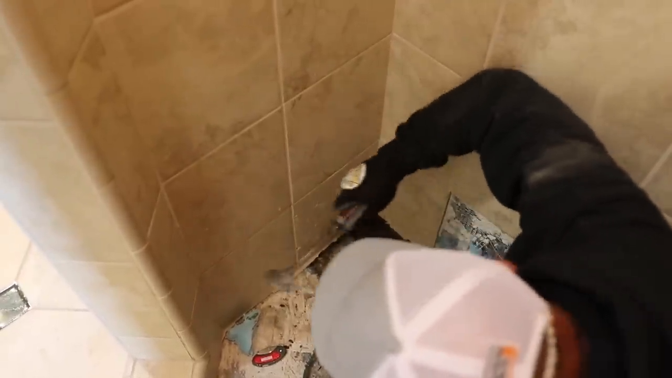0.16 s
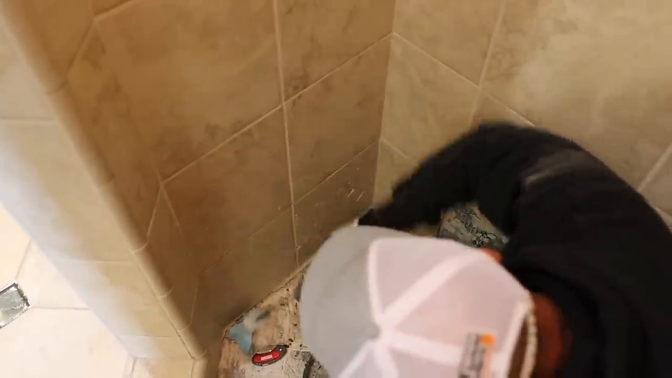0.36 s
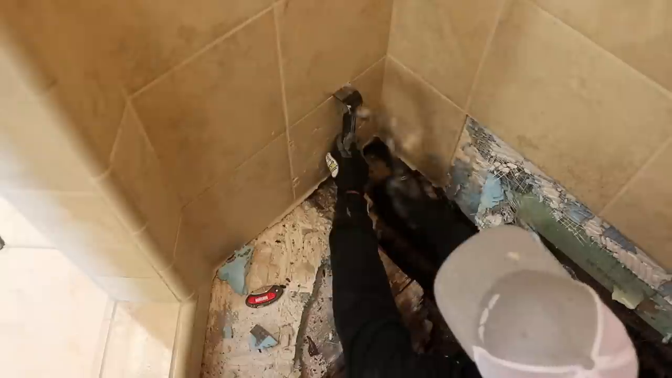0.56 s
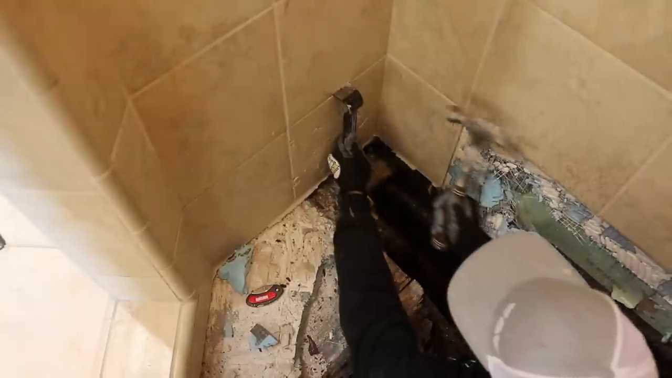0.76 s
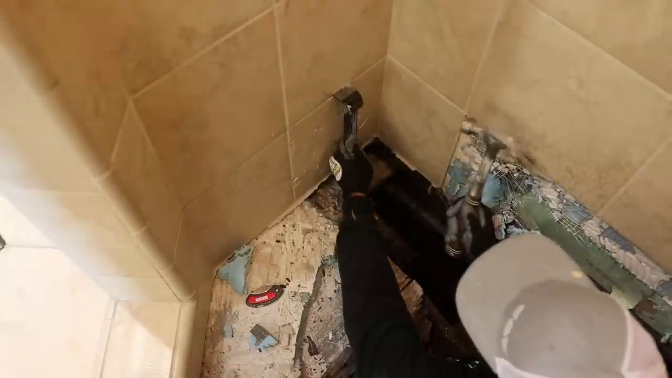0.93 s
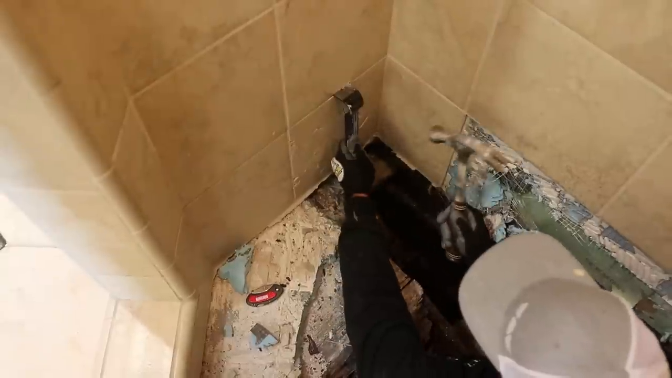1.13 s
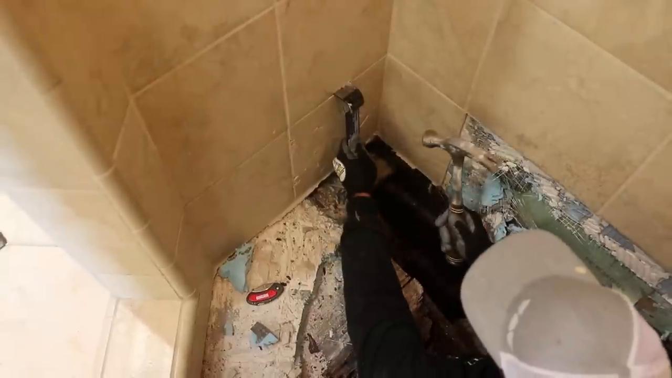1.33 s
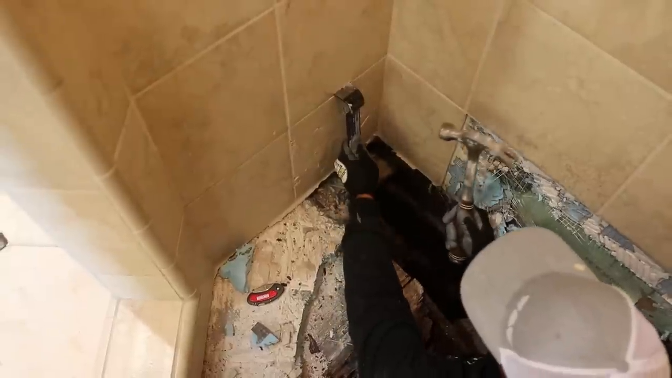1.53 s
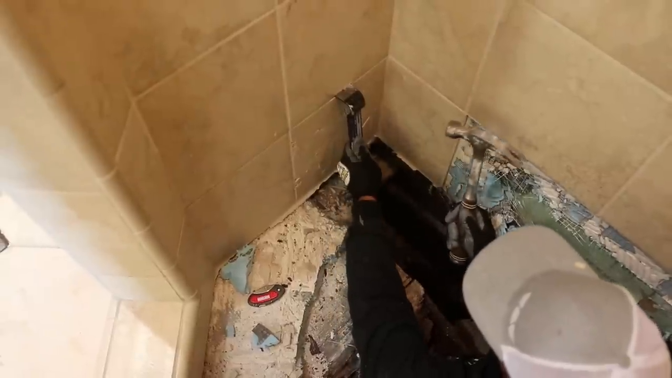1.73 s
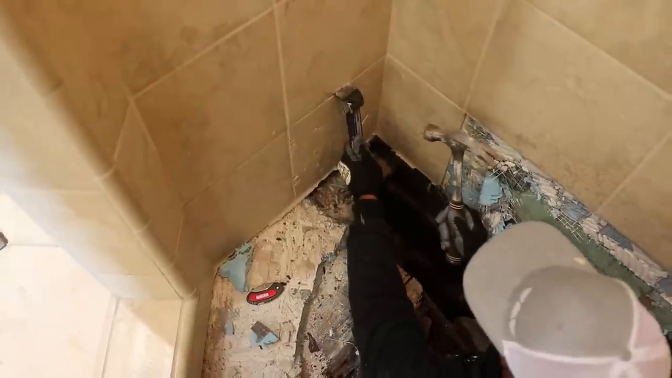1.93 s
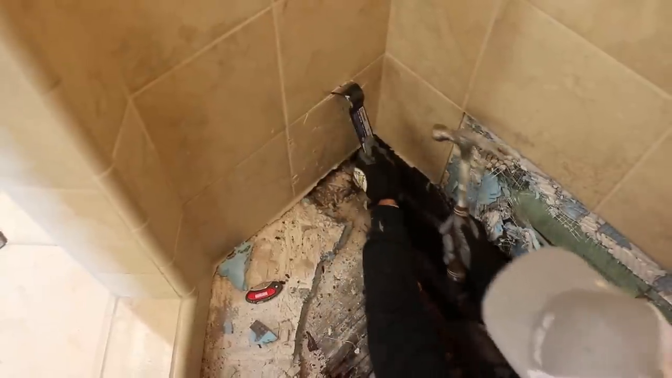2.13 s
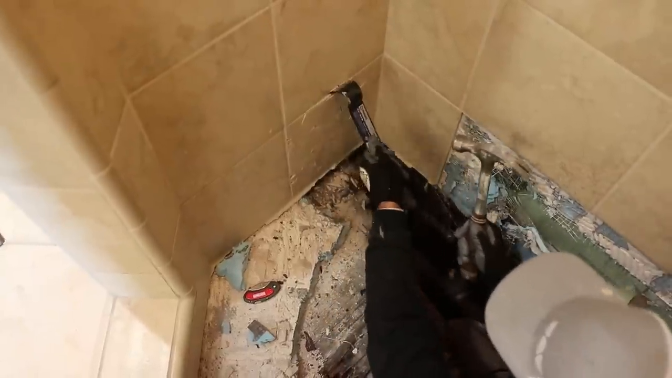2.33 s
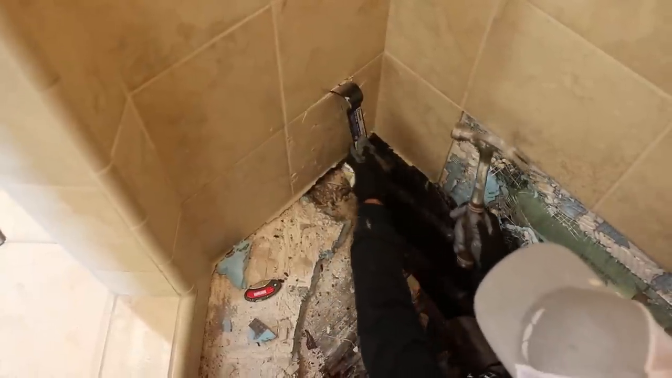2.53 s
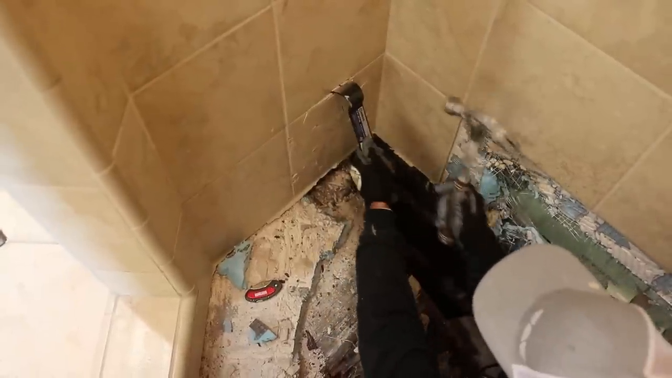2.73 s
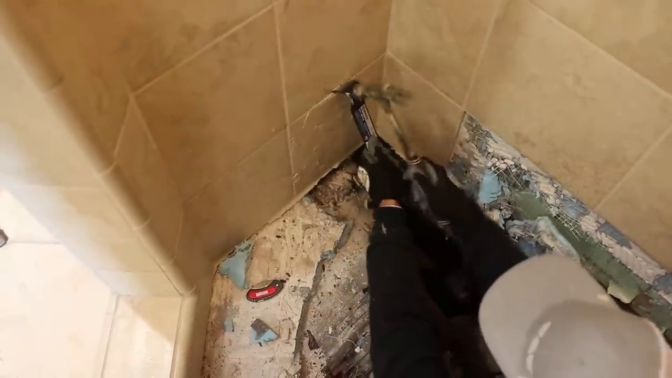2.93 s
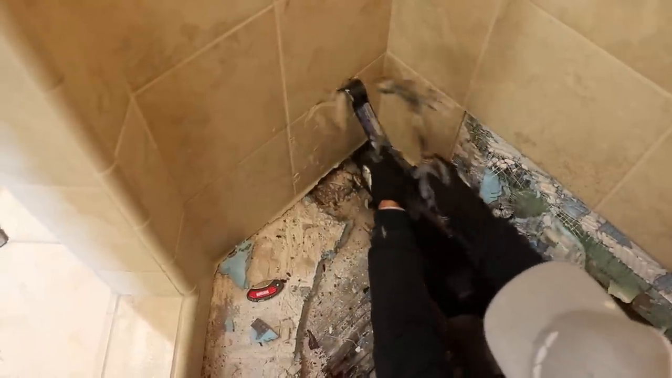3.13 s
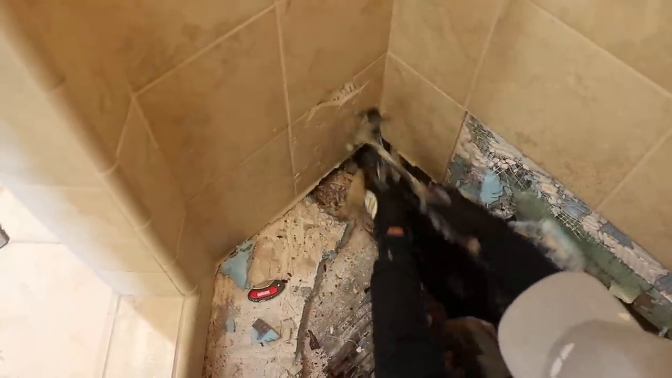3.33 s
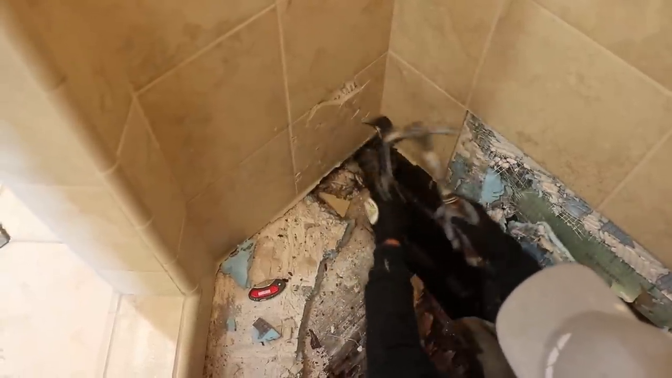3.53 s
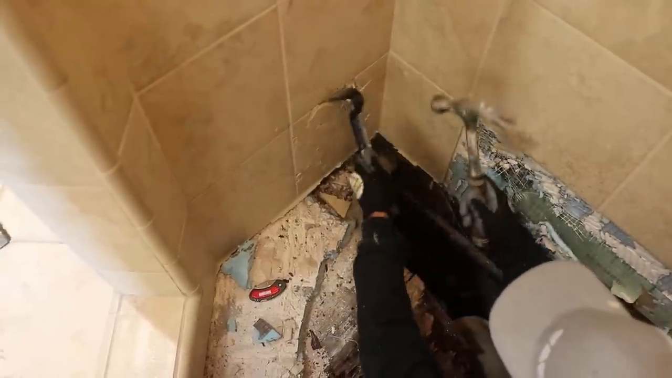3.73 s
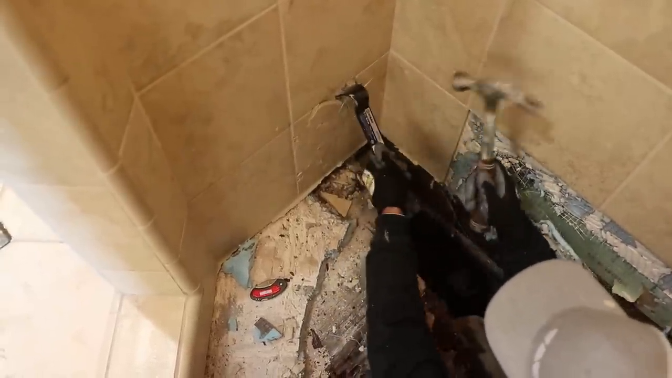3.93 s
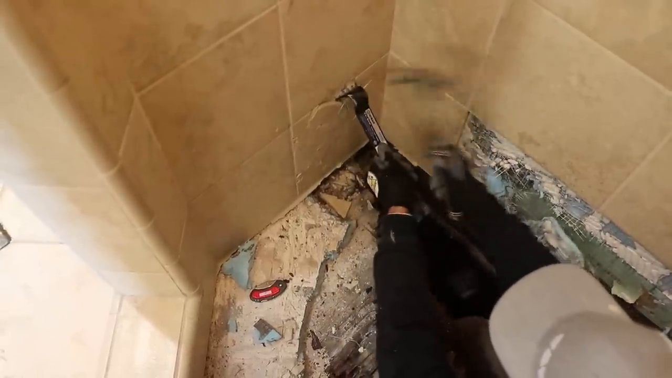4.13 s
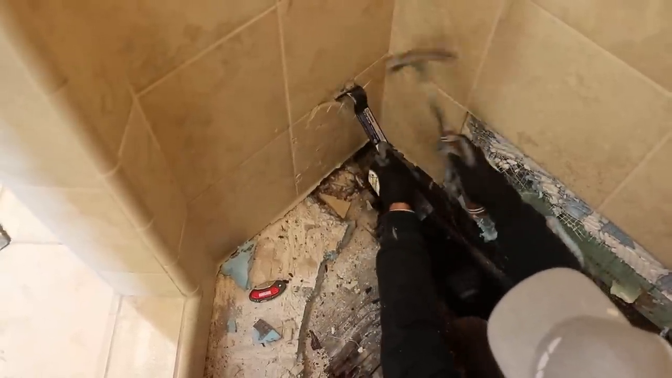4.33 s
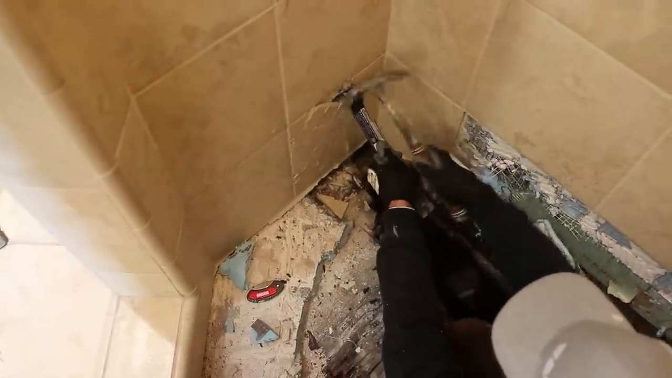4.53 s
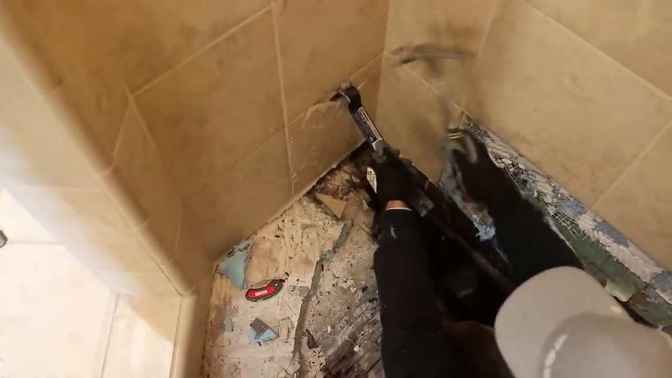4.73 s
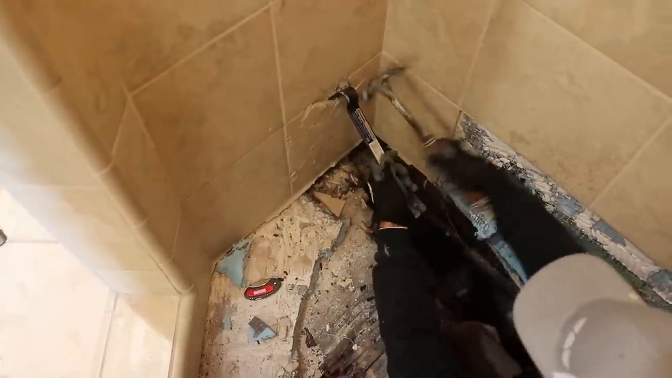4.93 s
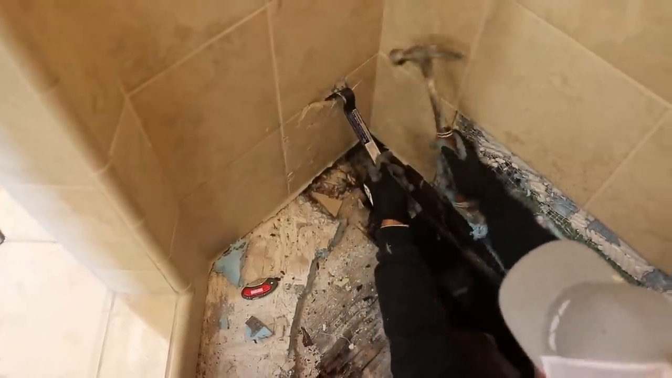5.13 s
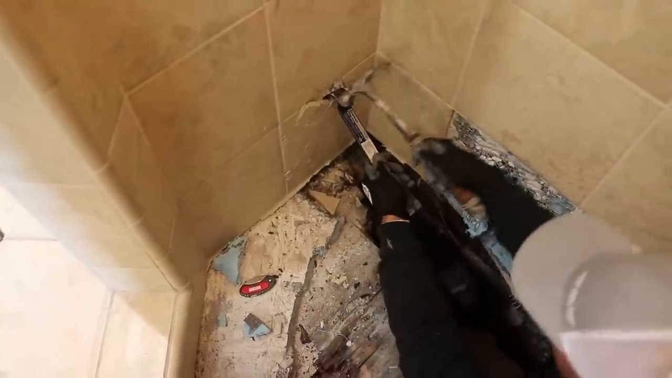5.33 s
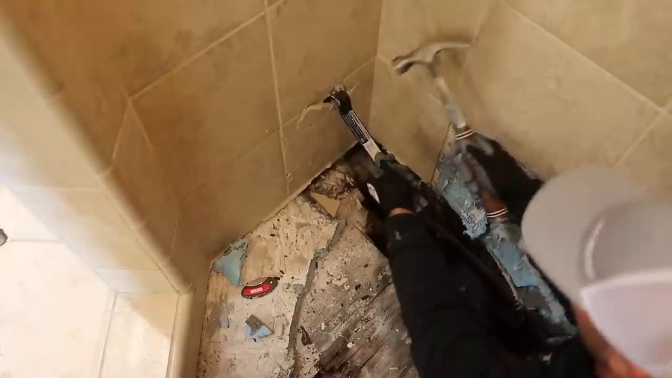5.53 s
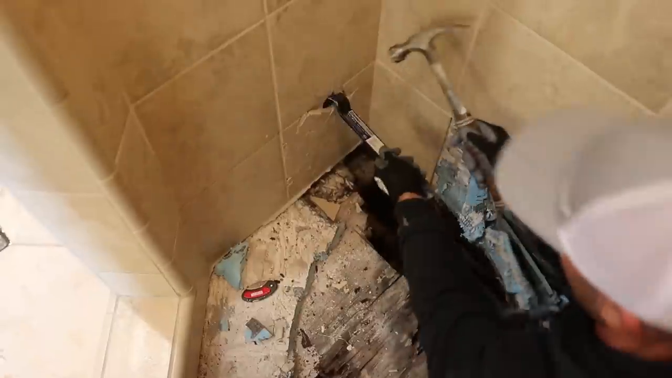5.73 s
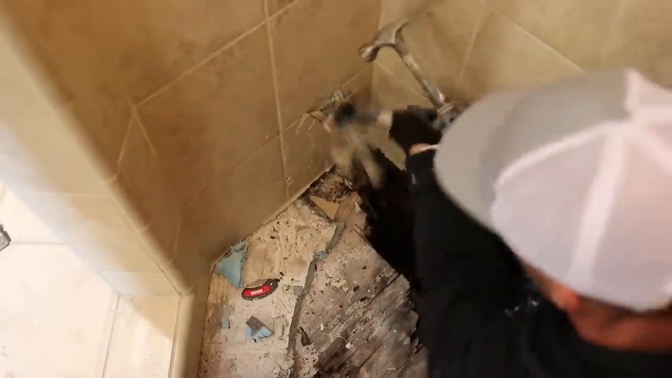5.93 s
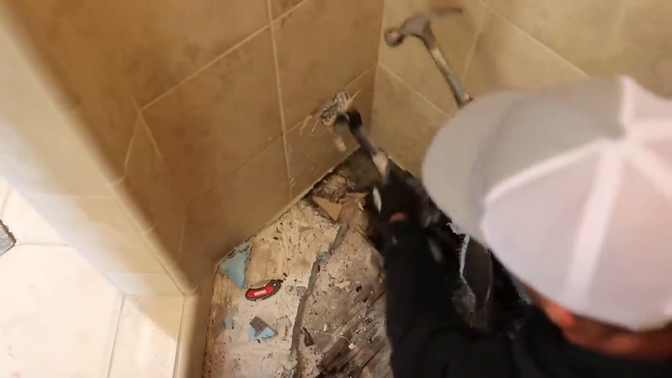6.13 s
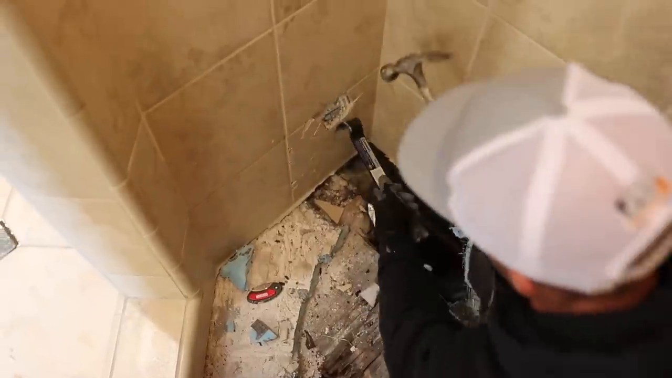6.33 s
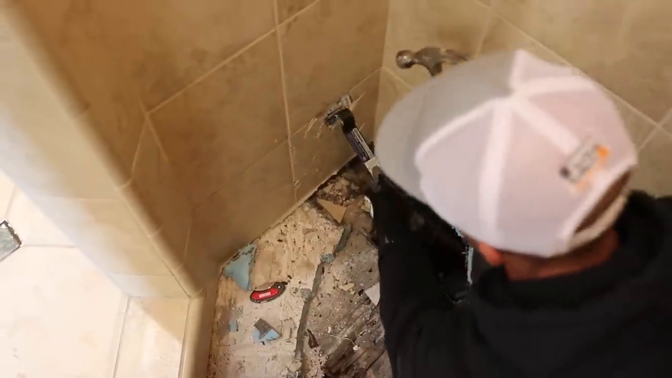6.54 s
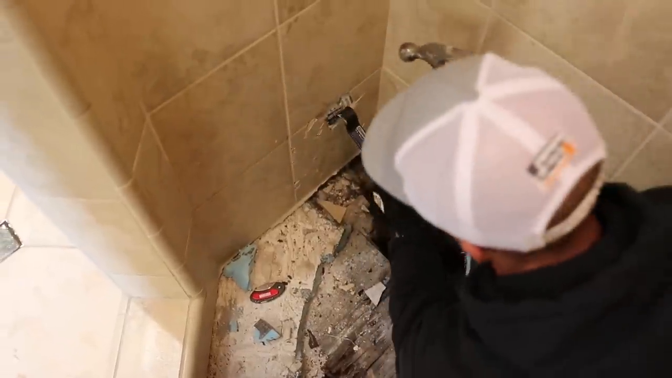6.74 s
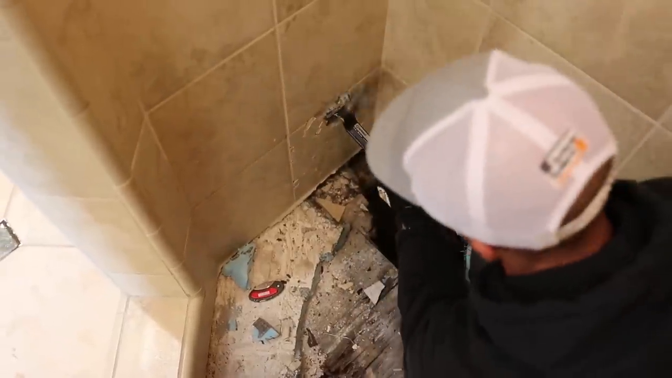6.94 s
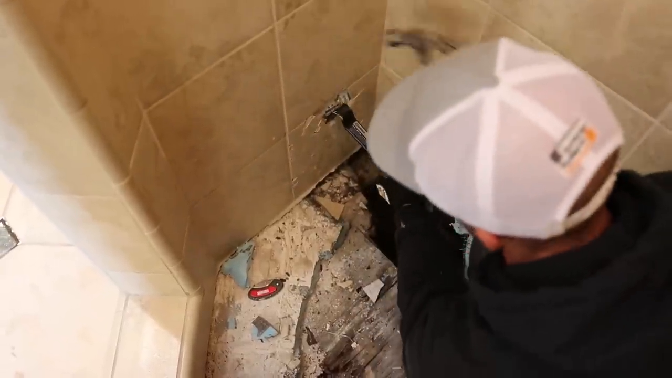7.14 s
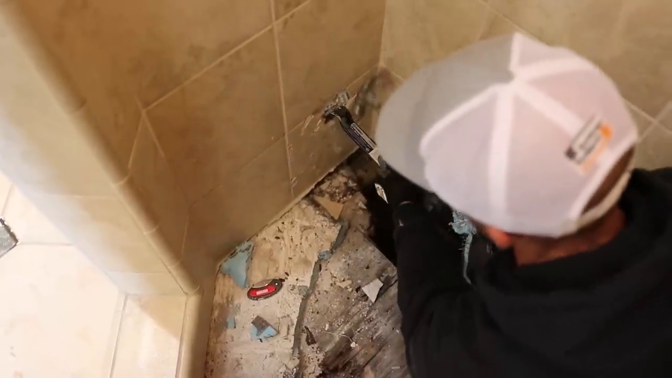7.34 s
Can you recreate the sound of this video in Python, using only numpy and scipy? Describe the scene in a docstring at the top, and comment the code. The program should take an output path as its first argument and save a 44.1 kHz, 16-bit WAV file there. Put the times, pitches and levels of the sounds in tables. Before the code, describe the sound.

In a small, hard, reverberant shower stall, a hammer cracks once onto a steel pry bar, with a high fluttering ring and a hollow wall boom. The bar is then rocked with small gritty ticks until a tile cracks loose, creaks and sheds debris. More blows follow at an even pace, then tile pieces knock and crumble, and two final blows land. Close microphone; the loud hits sound flattened, with quiet room air underneath.

```python
"""In a small, hard, tiled shower stall a claw hammer drives a steel pry bar behind the wall tiles.
Each blow is a crushing noise burst, dying bar modes, a fluttering ring and the hollow wall's dense boom.
Levering makes mortar tick and crumble (noise bursts, random grains) and creak by stick-slip; the bar scrapes;
tile pieces knock as damped modes and bursts, steel clinks and fine debris slides down as dense grains.
Sparse and dense echoes form the stall, quiet coloured noise the room air; a limiter flattens the loud blows."""
import sys
import numpy as np
from scipy import signal
from scipy.fft import rfft, irfft
from scipy.io import wavfile
from scipy.ndimage import uniform_filter1d, minimum_filter1d

SR = 44100
rng = np.random.default_rng(int(sys.argv[2]) if len(sys.argv) > 2 else 0)


def to_wav(s):
    """Save 16-bit WAV."""
    ch = np.atleast_2d(s).T  # columns
    pcm = np.round(np.clip(ch, -1, 1) * 32767)  # PCM
    wavfile.write(sys.argv[1], SR, pcm.astype(np.int16))


N = 325017
TIME = np.arange(N) / SR

# tile cracking loose and pieces knocking, levels relative: (time [s], clack level [dB], thud level [dB],
# snap level [dB], clack pitch [Hz], crunch t60 [s], delay of the rebound [s])
KNOCKS = [(1.867, -35, -55, -34.5, 778, 0.026, 0.054), (2.005, -21, -23, -23, 856, 0.067, .041),
          (2.016, -12.5, -40, -20, 1430, 0.053, .008), (2.034, -14.5, -28, -17.5, 557, 0.14, .012),
          (2.396, -30, -38, -45, 674, 0.07, 0.0086), (2.868, -47, -55, -35.5, 627, .03, 0.018),
          (3.187, -18, -20, -25, 608, .045, 0.022), (3.290, -23, -21, -24, 665, 0.052, 0.023),
          (3.348, -31, -39, -34, 583, 0.027, 0.018), (3.456, -22, -30, -30.5, 976, 0.021, 0.02),
          (3.544, -36.5, -51, -52.5, 423, 0.039, 0.025), (3.782, -30.5, -24.5, -43, 581, 0.03, .019),
          (5.651, -25, -36.5, -32, 928, .05, 0.018), (5.902, -20, -31, -18.5, 630, 0.14, .009),
          (5.918, -15, -19.5, -32, 1025, 0.031, .012), (6.040, -18, -45, -43, 712, 0.068, 0.0087),
          (6.142, -14, -28, -37.5, 516, 0.08, 0.014), (6.226, -30, -35, -44.5, 466, 0.048, 0.013),
          (6.340, -28, -32, -44, 400, 0.063, 0.0067), (6.429, -37.5, -58, -57, 624, .05, .008),
          (6.821, -41, -49, -47.5, 475, .05, 0.0097), (6.891, -37, -36, -41, 496, 0.076, 0.0066),
          (7.045, -26.5, -46, -53, 697, 0.044, .005)]
# spectrum of dull thuds and of the flexing board: (frequency [Hz], relative gain [dB])
THUD_COLOUR = [(20, -48), (60, 2), (170, 11.5), (280, 2), (500, -11.5), (2000, -63)]
# spectrum of hollow rattle and of the low crunch in a tick: (frequency [Hz], relative gain [dB])
RATTLE_COLOUR = [(150, -25.5), (400, 4.5), (700, 9), (1100, 5), (1800, 2.5), (3000, -8.5), (8000, -79)]


def amp(db):
    """Level to amplitude: 20 dB is a factor of ten."""
    return 10 ** (np.asarray(db) / 20)


def evened(x):
    """Energy normalization: scales to an rms of 1."""
    return x / np.sqrt(np.mean(x ** 2) + 1e-20)


def peaked(x, size=220):
    """Short-time energy normalization: scales the loudest 220 samples (5 ms) to an rms of 1."""
    power = uniform_filter1d(x ** 2, size, mode="constant")
    return x / np.sqrt(power.max())


def read(points, hz):
    """Interpolates a spectrum on a logarithmic frequency axis."""
    f, value = np.transpose(points)
    return np.interp(np.log(hz + 1), np.log(f + 1), value)


def add(mix, s, sound):
    """Superposition: adds a sound to the mix from time s, cutting what lies outside."""
    start = round(s * SR)
    sound = sound[max(-start, 0):]
    part = mix[max(start, 0):][:len(sound)]
    part += sound[:len(part)]


def coloured(x, points, size=2048):
    """Minimum-phase filtering: shapes the spectrum causally, so attacks stay sharp."""
    hz = abs(np.fft.fftfreq(size, 1 / SR))
    log_gain = np.log(amp(read(points, hz)))
    response = np.exp(np.conj(signal.hilbert(log_gain)))
    taps = np.fft.ifft(response).real[:size // 2]
    return signal.fftconvolve(x, taps)[:len(x)]


def burst(t60, grit, size=6000):
    """Impact excitation: a unit click, then an exponentially dying noise crunch of norm grit."""
    x = rng.standard_normal(size) * amp(-60 * np.arange(size) / SR / t60)
    x *= grit / np.linalg.norm(x)
    x[0] += 1
    return x


def modes(table, t, spread_db=2):
    """Modal synthesis: sums damped sines whose random shares stand for the varying point of contact."""
    total = 0
    for hz, db, t60 in table:
        level_db = db + spread_db * rng.standard_normal() - 60 * t / t60
        total = total + amp(level_db) * np.sin(2 * np.pi * hz * t) * rng.choice([-1, 1])
    return total


def waver(size, hz):
    """Low-passed Gaussian noise: a slow random fluctuation of rms 1."""
    spectrum = rfft(rng.standard_normal(size))
    low_pass = np.exp(-(np.fft.rfftfreq(size, 1 / SR) / hz) ** 2)
    return evened(irfft(spectrum * low_pass, size))


def grains(per_s, spread_db):
    """Shot noise: clicks at random times, of random sign and uneven size."""
    size = amp(spread_db * np.minimum(rng.exponential(1, N), 4))
    return size * rng.choice([-1, 1], N) * (rng.random(N) < per_s / SR)


def stroke(start, length, attack_s, fade_db_per_s):
    """Force envelope: rises linearly, holds to the end of its length, then dies exponentially."""
    t = TIME - start
    return np.clip(t / attack_s, 0, 1) * amp(-fade_db_per_s * np.maximum(t - length, 0))


def stall(x, early_db, late_db, early_t60=0.17, echoes_per_s=900):
    """Room response: sparse early echoes of close tiled walls, then the diffuse decay of the bathroom."""
    # reverberation time by band: (frequency [Hz], t60 [s])
    decay_times = [(100, 0.39), (400, 0.51), (1000, 0.57), (2500, 0.58), (5000, 0.58), (9000, 0.43),
                   (15000, 0.23)]
    t = np.arange(SR) / SR
    early, late = rng.choice([-1., 1.], (2, SR))
    early *= (rng.random(SR) < echoes_per_s / SR) * (t > .002) * amp(-60 * t / early_t60)
    late *= 1 - np.exp(-t / 0.0022)  # the diffuse field builds up
    hz, at, bands = signal.stft(late, SR, nperseg=256)
    bands = bands * amp(-60 * at / read(decay_times, hz)[:, None])
    late = signal.istft(bands, SR, nperseg=256)[1][:SR]
    echo = amp(early_db) * early / np.linalg.norm(early)
    echo += amp(late_db) * late / np.linalg.norm(late)
    echo[0] += 1  # direct sound
    return signal.fftconvolve(x, echo)[:len(x)]


def room_air(air_db=-62.5):
    """Stationary noise: quiet air, shaped by its spectrum."""
    # (frequency [Hz], relative gain [dB])
    air_colour = [(18, -55), (30, -9), (121, 6.5), (165, -21), (311, -6), (355, 0.5), (461, -7),
                  (1100, -14.5), (1320, -17), (16000, -30.5)]
    return amp(air_db) * evened(coloured(rng.standard_normal(N), air_colour))


def boom(t, bass_db, t60=0.59, bass_edge_hz=100):
    """High modal density: many close wall modes, crowded round resonances, die away together."""
    # resonances of the hollow wall: (frequency [Hz], width [Hz], relative level [dB])
    resonances = [(48.7, 10, -4.5), (73.8, 16, 2), (135.6, 14.5, 4), (140, 27, -13.5), (187.4, 24, -9.5),
                  (300, 84, -5), (392, 86, -4), (632, 120, -6), (960, 240, -10)]
    hz = np.fft.rfftfreq(len(t), 1 / SR)
    shape = 0
    for centre, width, db in resonances:
        shape = shape + amp(db) / np.sqrt(width) / (1 + (2 * (hz - centre) / width) ** 2)
    # the deepest modes depend on where the bar sits
    shape = shape * amp(bass_db / (1 + (hz / bass_edge_hz) ** 6))
    x = evened(irfft(shape * np.exp(2j * np.pi * rng.random(len(hz))), len(t)))
    x /= np.sqrt(uniform_filter1d(x ** 2, size=3000))  # even out the level before the decay
    return x * amp(-60 * t / t60) * (1 - np.exp(-t / .002))


def bar_ring(t, t60, ring_hz=5317):
    """Weakly damped mode: the one that the hand hardly damps, fluttering in the standing waves."""
    # the ringing bar moves through the standing waves of the stall
    sway = 1 + .45 * (waver(len(t), hz=22) + 1j * waver(len(t), hz=22))
    return amp(-60 * t / t60) * (sway * np.exp(2j * np.pi * ring_hz * t)).imag


def hammer(crack_db=-16, clang_db=-27, boom_db=-24, ring_db=-27):
    """Impact on coupled bodies: each blow crushes mortar, clangs the bar and sets the wall booming."""
    # hammer on the bar, levels relative: (time [s], force [dB], wall boom [dB], deep bass of the boom [dB],
    # clang [dB], treble tilt [dB per octave, well above 1 kHz], long ring [dB], ring t60 [s])
    blows = [(-.19, 4.5, -4, 3, -52, -5.5, -3, 0.49), (.566, -35, -2, 0, -30, -3, 17.5, 0.34),
             (.603, 0.5, 8, -13, -11, 0.5, 7.5, 0.77), (2.988, -2.5, 3.5, -8, -31, -.5, 3, 1),
             (4.2607, -5.5, 3.5, 1.5, -15, 2.5, 5, 0.79), (4.614, -3.5, 2.5, 1.5, -10.5, 1.5, 7, 0.63),
             (4.956, -2, 0.5, 1, -15.5, 4.5, 4.5, 0.62), (5.319, -6.5, 3.5, 3.5, -16, 4, -13, 1),
             (7.003, -5.5, 5, -2, -16, 4, 5, 0.69), (7.337, -7, -18, 0, -6, 2, 8, 0.99)]
    # short modes of the bar before the grip acts: (frequency [Hz], relative level [dB], t60 [s])
    bar_modes = [(2020, -23, 0.25), (2680, -28, 0.12), (3820, -10, 0.095), (3980, -5, 0.035),
                 (4130, 10.5, 0.051), (4540, -27, .12), (5400, 6, 0.27), (6210, -8, 0.15),
                 (6410, -5, 0.047), (8040, 3.5, 0.1), (8070, 7.5, 0.049), (9700, -16, 0.32),
                 (10600, -8, 0.025), (12000, -6.5, 0.13), (13830, -16, 0.06)]
    # crushing noise before the tilt: (frequency [Hz], relative gain [dB])
    blow_colour = [(30, 13), (100, 9), (450, 7), (900, 6.5), (1500, -1.5), (2300, -7), (2900, -3.5),
                   (3500, -10.5), (4400, -4.5), (6200, -7.5), (7400, -17.5), (10000, -14), (11500, -26.5),
                   (16000, -29.5)]
    out, t = np.zeros(N), np.arange(int(1.4 * SR)) / SR
    for s, force, wall_db, bass_db, clang, tilt, ring, ring_t60 in blows:
        colour = [(hz, db + tilt * np.log2(1 + hz / 1000)) for hz, db in blow_colour]
        crushing = burst(t60=0.025, grit=3.6, size=len(t))
        crack = amp(crack_db) * peaked(coloured(crushing, colour))
        # grip and wedging damp the bar and shift its modes a little from blow to blow
        gripped = [(hz * (1 + .015 * rng.standard_normal()), db, min(t60, .2)) for hz, db, t60 in bar_modes]
        steel = amp(clang_db + clang) * modes(gripped, t, spread_db=4.0)
        wet = stall(crack + steel, early_db=9, late_db=0.5, echoes_per_s=2500)
        wall = amp(boom_db + wall_db) * boom(t, bass_db)
        tone = amp(ring_db + ring) * bar_ring(t, ring_t60)
        add(out, s, amp(force) * (wet + wall + tone))
    return out


def scraping():
    """Friction force: how hard the steel edge is dragged over the tile."""
    # the bar scraping the tile edge: (start [s], length [s], relative level [dB])
    drags = [(3.819, 0.08, -40), (4.007, 0.067, -36.5), (6.534, 0.085, -41.5)]
    return sum(amp(db) * stroke(s, length, attack_s=0.014, fade_db_per_s=356) for s, length, db in drags)


def crumble(grit_db=-3, rattle_db=-3, flex_db=-2, debris_db=-27, scrape_flex_db=-2, attack_s=0.019):
    """Granular fracture: pushes and knocks loosen grains that run down behind the tile; the board rumbles."""
    # pushes on the bar that crumble mortar and flex the wall board, levels relative:
    # (start [s], length [s], grit level [dB], hollow rattle level [dB], board rumble level [dB])
    pushes = [(0.87, 0.42, -61, -67, -58), (1.395, 0.52, -69, -66, -59), (1.871, 0.12, -52.5, -51, -74),
              (2.01, 0.058, -29, -31, -35.5), (2.268, 0.13, -35.5, -36.5, -40),
              (2.465, 0.074, -50, -42, -68), (2.66, 0.65, -57, -61, -58), (3.176, 0.13, -41, -33.5, -31.5),
              (4.072, 0.092, -66, -63, -47.5), (5.658, 0.042, -38, -40, -44.5),
              (5.756, 0.18, -36.5, -36, -57), (5.889, 0.013, -35, -28, -27.5), (6.04, 0.097, -70, -70, -43),
              (6.456, 0.22, -63.5, -64, -53.5), (6.857, 0.056, -63, -58, -48)]
    # spectrum of breaking grit: (frequency [Hz], relative gain [dB])
    grit_colour = [(600, 8), (2000, -17), (3200, 8.5), (6000, 7), (8000, -0.5), (13000, 1.5),
                   (16000, -38.5)]
    breaking = falling = bending = shaken = 0
    for s, length, break_db, fall_db, bend_db in pushes:
        breaking = breaking + amp(break_db) * stroke(s, length, attack_s, fade_db_per_s=304)
        falling = falling + amp(fall_db) * stroke(s, length, attack_s, fade_db_per_s=202)
        bending = bending + amp(bend_db) * stroke(s, length, attack_s, fade_db_per_s=109)
    for s, clack, *_ in KNOCKS:  # rubble that each knock shakes loose
        shaken = shaken + amp(clack + debris_db) * stroke(s, 0, attack_s, fade_db_per_s=152)
    grit = evened(coloured(grains(per_s=350, spread_db=6.5), grit_colour)) * breaking
    rattle = evened(coloured(grains(per_s=830, spread_db=5.0), RATTLE_COLOUR)) * (falling + shaken)
    flex = evened(coloured(grains(per_s=480, spread_db=3.0), THUD_COLOUR))
    flex *= bending + amp(scrape_flex_db) * scraping()  # a scrape also shakes the board
    loose = amp(grit_db) * grit + amp(rattle_db) * rattle
    return stall(loose, early_db=-0.5, late_db=-23) + amp(flex_db) * flex


def tick(crunch_db, top_db, tick_db=-5):
    """Brittle fracture: one mortar bond snaps, a short burst with a bright top and a low crunch."""
    # middle of the tick: (frequency [Hz], relative gain [dB])
    tick_colour = [(500, -5.5), (2000, 3), (3000, 5), (4300, 0), (5900, 3), (7500, -2), (10000, -28),
                   (16000, -75)]
    # bright top: (frequency [Hz], relative gain [dB])
    top_colour = [(3000, -82), (7000, -39), (9000, -2.5), (13000, -5.5), (16000, -12)]
    snap = burst(t60=.012, grit=1.2, size=2000)
    parts = (tick_db, tick_colour), (top_db, top_colour), (crunch_db, RATTLE_COLOUR)
    return sum(amp(db) * peaked(coloured(snap, colour)) for db, colour in parts)


def ticks(crunch_db=-6, nudge_crunch_db=-8, uneven_db=2.5, count=3, gap_s=0.013, fade_db=-2):
    """Successive fracture: each nudge snaps an uneven run of mortar bonds; chips break or land singly."""
    # the bar rocked in the joint: (time [s], mean level of the first tick [dB])
    nudges = [(1.077, -52), (1.1659, -47), (1.2372, -43), (1.32, -42.5), (1.409, -40.5), (1.49, -41),
              (1.586, -44), (1.6664, -38), (1.749, -39), (1.982, -38)]
    # single chips breaking off or landing: (time [s], level [dB], relative low crunch level [dB])
    chips = [(1.2012, -46.5, -3), (1.7794, -31, -6.5), (2.491, -31, -18), (2.579, -32, -28),
             (3.369, -35, -8), (3.622, -39, -1), (3.711, -58, 14.5), (3.761, -56, 19), (5.619, -34, -9),
             (5.809, -29, -13), (5.8328, -28, 2), (5.8556, -27, -9), (6.3684, -34.5, -38),
             (6.603, -35.5, 6.5)]
    out = np.zeros(N)
    for s, db in nudges:
        for k in range(count):
            late, size = rng.standard_normal(2)
            at = s + gap_s * (k + 0.09 * late * np.sqrt(k))  # timing strays further along the run
            gain = amp(db + fade_db * k + uneven_db * size)
            add(out, at, gain * tick(crunch_db + nudge_crunch_db, top_db=-11))
    for s, db, crunch in chips:
        add(out, s, amp(db) * tick(crunch_db + crunch, top_db=-16))
    return stall(out, early_db=-3.5, late_db=-19, echoes_per_s=2400)


def knocks(clack_db=-2, crunch_db=-2, thud_db=-1, snap_db=-1, rebound_db=-6,
           overtone_damping=0.45, clack_t60=0.035):
    """Colliding solids: tile pieces clack, crunch, thud and snap, then rebound once, softer."""
    # modes of a tile piece: (multiple of its pitch [ratio], relative level [dB])
    tile_modes = [(.46, -14.5), (.72, -2), (1, 4.5), (1.31, -1), (1.74, -13.5), (2.3, -26), (3.1, -17),
                  (4.4, -31)]
    # the dull crunch of a knock: (multiple of its pitch [ratio], relative gain [dB])
    crunch_colour = [(.1, -32), (.5, 0), (1, 1), (1.9, -6), (3, -16.5), (6, -28.5), (20, -56)]
    # brittle snap: (frequency [Hz], relative gain [dB])
    snap_colour = [(800, 4.5), (2000, -3.5), (3000, 2.5), (5500, -2), (7500, -7), (12500, -11.5),
                   (16000, -16)]
    out, t = np.zeros(N), np.arange(6000) / SR
    for s, clack, thud, snap, pitch, crunch_t60, rebound_s in KNOCKS:
        colour = [(pitch * k, db) for k, db in crunch_colour]
        for delay, contact_db in (0, 0), (rebound_s, rebound_db):
            # each contact shifts the modes a little; higher modes die sooner
            piece = [(pitch * k * (1 + 0.044 * rng.standard_normal()), db, clack_t60 / k ** overtone_damping)
                     for k, db in tile_modes]
            body = amp(clack_db + clack) * peaked(modes(piece, t, spread_db=2.0))
            body += amp(crunch_db + clack) * peaked(coloured(burst(t60=crunch_t60, grit=3.4), colour))
            low = amp(thud_db + thud) * peaked(coloured(burst(t60=0.21, grit=1.0), THUD_COLOUR))
            high = amp(snap_db + snap) * peaked(coloured(burst(t60=0.033, grit=4.7), snap_colour))
            add(out, s + delay, amp(contact_db) * (body + low + high))
    return stall(out, early_db=-5.5, late_db=-14.5, early_t60=0.13, echoes_per_s=1200)


def creak(creak_db=-3, slip_spread_db=2.0):
    """Stick-slip friction: an uneven train of gritty snaps, each of its own size and grain."""
    # the levered bar slipping on mortar:
    # (start [s], length [s], relative level [dB], slip rate at its middle before wavering [slips per s])
    slipping = [(2.153, .045, -28, 190), (2.256, .03, -34.5, 105), (2.29, .115, -30, 170),
                (2.502, .03, -33, 260)]
    # (frequency [Hz], relative gain [dB])
    creak_colour = [(100, -1.5), (400, 5.5), (700, 11), (1300, -1), (2200, -1), (3100, 4.5), (4500, 4),
                    (5800, 5.5), (7500, -4.5), (11000, -4.5), (13300, 3.5), (14500, -15), (16000, -0.5)]
    start, length, _, rate = np.transpose(slipping)
    per_s = np.interp(TIME, start + length / 2, rate)
    pressure = sum(amp(db) * stroke(s, hold, attack_s=0.0028, fade_db_per_s=705) for s, hold, db, _ in slipping)
    # a slip falls wherever the running count passes a whole number
    turns = np.cumsum(per_s * np.exp(.3 * waver(N, hz=120))) / SR
    slips = np.diff(np.floor(turns), prepend=0) / np.sqrt(per_s)
    slips *= amp(slip_spread_db * rng.standard_normal(N))
    fade = np.exp(-np.arange(400) / SR / .0009)
    snaps = signal.fftconvolve(slips, fade)[:N] * rng.standard_normal(N)
    x = evened(coloured(snaps, creak_colour))
    return stall(amp(creak_db) * x * pressure, early_db=-6.0, late_db=-21, echoes_per_s=1400)


def slide(slide_db=-47.5):
    """Granular flow: fine debris rushes down the hollow behind the tile as dense small impacts."""
    # sand sliding down inside the wall: (start [s], length [s], attack [s], fade [dB per s])
    sand_flow = (2.37, .36, 0.065, 21)
    # (frequency [Hz], relative gain [dB])
    sand_colour = [(150, -26), (500, -2), (750, 8), (950, 1.5), (1200, 2.5), (1600, -13), (2250, -4.5),
                   (2800, -10), (4000, -8.5), (6000, -26), (16000, -26)]
    rush = evened(coloured(grains(per_s=2700, spread_db=-2.0), sand_colour))
    return amp(slide_db) * stroke(*sand_flow) * rush


def clinks(clink_db=0, t60=0.033):
    """Contact damping: pressed against the wall, the steel rings only briefly."""
    # steel glancing off tile: (time [s], level [dB], main frequency [Hz])
    glances = [(3.186, -22.5, 8160), (3.228, -23.5, 3040), (3.31, -20, 4320), (3.368, -28.5, 3060),
               (4.259, -27, 4200), (4.613, -10.5, 4350), (4.956, -36, 4570), (5.964, -22.5, 4230),
               (6.537, -43, 4200), (7.002, -20, 6300)]
    out, t = np.zeros(N), np.arange(8000) / SR
    for s, db, hz in glances:
        partials = [(hz * k, share_db, t60) for k, share_db in ((.89, -7), (1, 0), (1.2, -9))]
        add(out, s, amp(clink_db + db) * modes(partials, t))
    return stall(out, early_db=-3, late_db=-19)


def scrape(scrape_db=-2):
    """Friction over roughness: the steel edge rasps over grit as a stream of small impacts."""
    # (frequency [Hz], relative gain [dB])
    scrape_colour = [(60, -17), (300, 0), (600, 7.5), (950, -3.5), (1500, 6.5), (1850, 2.5), (2300, -10),
                     (2900, -3), (4300, -10.5), (5500, -7), (7500, -24.5), (10700, -19), (12300, -21),
                     (16000, -38)]
    rasp = evened(coloured(grains(per_s=1500, spread_db=3.0), scrape_colour))
    return stall(amp(scrape_db) * rasp * scraping(), early_db=-6.5, late_db=-18.5)


def scene():
    """Superposition: all the work on the wall over quiet room air."""
    blows_and_ground = room_air() + hammer()
    levering = crumble() + ticks() + creak() + scrape()
    pieces = knocks() + slide() + clinks()
    return (blows_and_ground + levering + pieces)[None]


def record(dry, ceiling_db=-15, recovery_db_per_s=110, hold_s=0.042, round_at=.25, edge_hz=15800):
    """Peak limiting: gain ducks, holds and swells back; peaks are then rounded and the band limited."""
    over_db = np.maximum(20 * np.log10(abs(dry[0]) + 1e-9) - ceiling_db, 0)
    hold = 2 * int(hold_s * SR / 2) + 1
    held = -minimum_filter1d(-over_db, hold, origin=hold // 2)  # largest excess of the last 42 ms
    fall = recovery_db_per_s * TIME
    duck_db = uniform_filter1d(np.maximum.accumulate(held + fall) - fall, size=40)
    rounded = round_at * np.tanh(dry * amp(-duck_db) / round_at)
    low_pass = signal.firwin(301, edge_hz, window=("kaiser", 8), fs=SR)
    return signal.oaconvolve(rounded, low_pass[None], "same")


dry = scene()
out = record(dry)
to_wav(out)
```